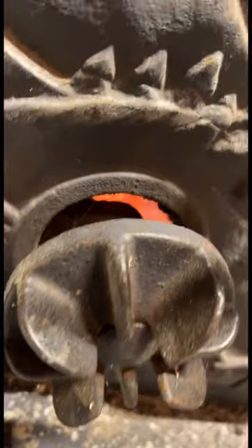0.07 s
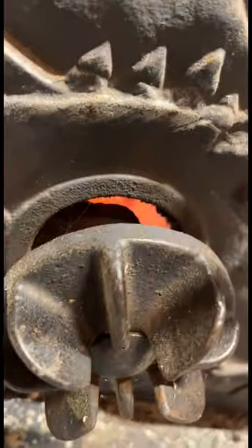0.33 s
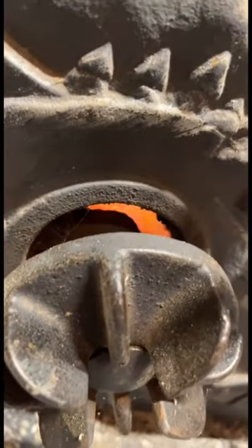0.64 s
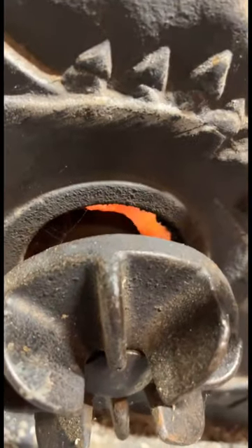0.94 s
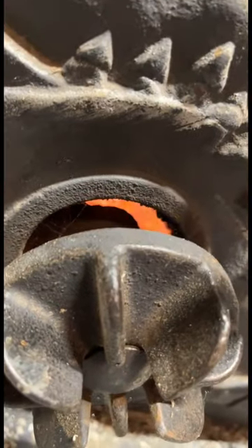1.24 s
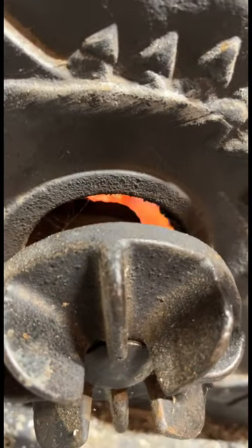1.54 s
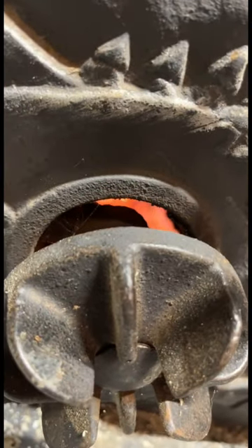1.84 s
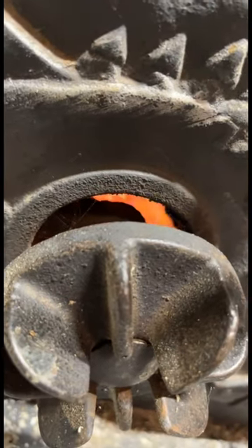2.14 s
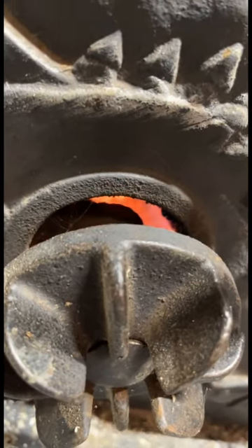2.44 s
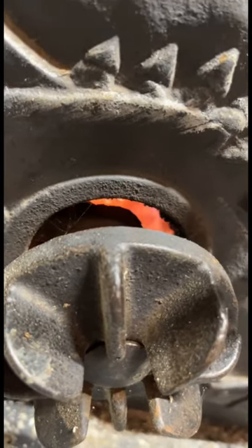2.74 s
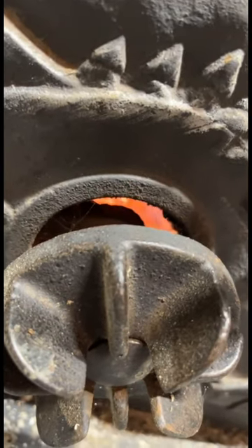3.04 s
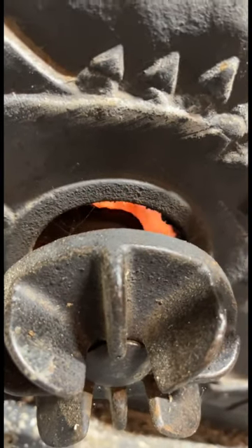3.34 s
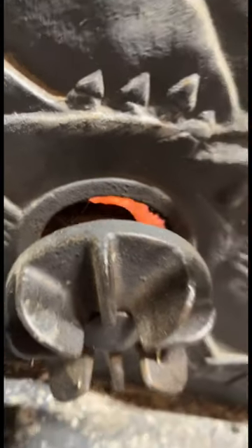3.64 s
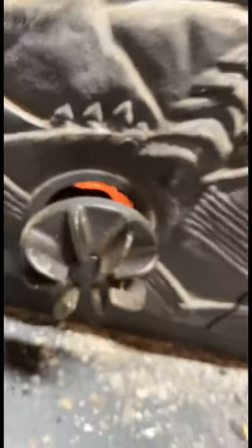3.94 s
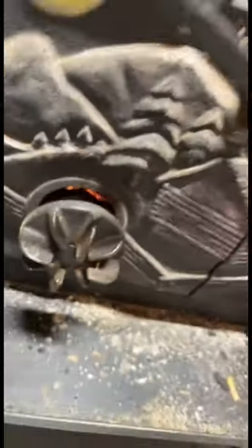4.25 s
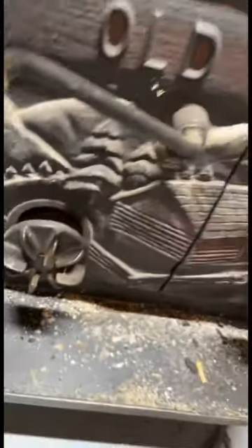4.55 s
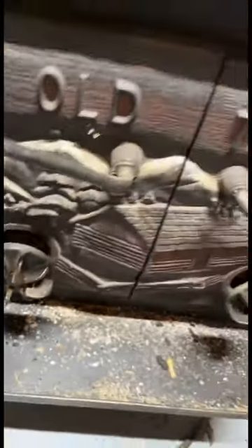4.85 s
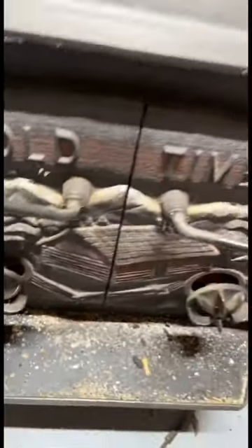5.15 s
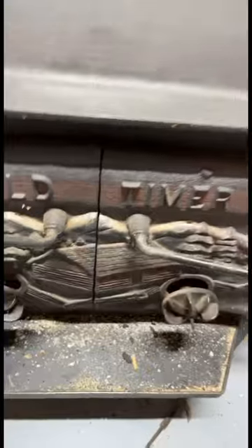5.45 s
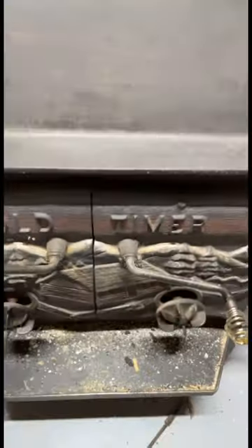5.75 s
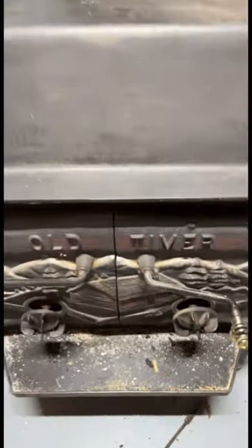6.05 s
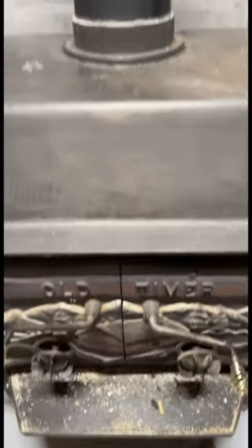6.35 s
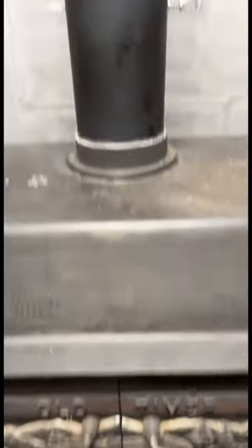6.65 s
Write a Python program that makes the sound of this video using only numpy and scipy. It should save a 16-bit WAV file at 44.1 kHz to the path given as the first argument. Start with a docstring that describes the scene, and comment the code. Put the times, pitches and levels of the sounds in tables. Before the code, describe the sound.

A wood stove fire roars in rapid, throbbing puffs through its air vent, with sharp crackles scattered throughout.

```python
"""Close to the vent of an iron wood stove, a fire builds, pulling in about ten puffs of air a second.
Each puff hisses in the gap, roars in the firebox and ends in a low thud; the wood crackles throughout.
A faint draught whistle fades by 2 s as the embers' sizzle comes up. From 3.5 s the listener backs away:
a thin ring swells and dies, then come a few soft rustles. By 6 s the stove is heard from out in the
room, where the puffs blur, the crackles echo more, a whistle returns and the fire eases."""
import sys
import numpy as np
from scipy import signal
from scipy.fft import rfft, irfft
from scipy.io import wavfile
from scipy.ndimage import uniform_filter1d

SR = 44100
rng = np.random.default_rng(int(sys.argv[2]) if len(sys.argv) > 2 else 0)


def master(y):
    """Save y as 16-bit WAV."""
    cut = np.clip(np.atleast_2d(y).T, -1, 1)
    pcm = np.round(cut * 32767)  # scale
    wavfile.write(sys.argv[1], SR, pcm.astype(np.int16))


N = 295911
TIME = np.arange(N) / SR
FREQ = np.fft.rfftfreq(N, 1 / SR)
START_S = 0.221
PUFF_HZ, FIRST_INTAKE_S = 10.01, 0.061

# The fire's strength, building and then easing: time_s, level_db
FIRE_STRENGTH = [(0.2, -4), (1.0, 1), (2.3, 1.5), (3.3, 1.5), (4.3, -0.5), (5.45, -1), (5.8, -2),
                 (6.7, -5.5)]
# Listener's perspective: time_s, nearness (1 at the vent gap, 0 out in the room)
NEARNESS = [(0.2, 0.75), (3.5, 0.78), (4.0, 0.58), (4.5, 0.26), (5.3, 0.38), (5.9, 0.03), (6.7, 0.031)]
# Dull bed that the stove gives off on all sides: freq_hz, gain_db
MURMUR_EQ = [(60, -22), (88, -0.5), (100, -3), (116, 5), (145, -8), (167, -6), (200, -16.5), (222, -12.5),
             (270, -19), (345, -9.5), (400, -15.5), (500, -17.5), (800, -27.5), (1500, -52.5)]
# Faint draught whistles: start_s, end_s, pitch_hz, filter_width_hz, level_db
WHISTLE_CUES = [(0.1, 2.04, 895, 8.3, -68.5), (5.7, 7.1, 979, 29, -66)]
# Soft rustles beside the listener: centre_s, half_length_s, level_db
RUSTLE_CUES = [(4.828, 0.028, -57.5), (5.428, 0.026, -57), (5.532, 0.036, -53), (5.67, 0.1, -59.5)]
# Tone of the rubbing: freq_hz, gain_db
RUSTLE_EQ = [(200, -11), (500, -7), (1100, 5), (2500, -1), (5000, -5.5), (9000, -4.5), (15500, -17)]
# Fader ride of the embers' sizzle: time_s, level_db
SIZZLE_RIDE = [(0.2, -81), (1.2, -77), (2.1, -68.5), (3.6, -71), (4.2, -62.5), (4.45, -66), (4.75, -62),
               (5.6, -62), (6.7, -66.5)]
# Bright, fine hiss, with a deep notch near 11 kHz: freq_hz, gain_db
FINE_HISS_EQ = [(1500, -5), (3500, 3), (6000, -0.5), (8000, 0.5), (9900, 0), (11300, -31), (13000, -4),
                (15300, -3), (16500, -0.5)]
# Reverb time of the room: freq_hz, t60_s
ROOM_DECAY = [(500, 0.4), (2000, 0.69), (8000, 0.45), (16000, 0.45)]
# Featured crackles: start_s, level_db, knock_offset_db, tilt_db_per_octave
LOUD_CRACKLES = [(0.514, -44, -7, 0), (1.161, -40.5, -20, 8), (1.598, -35.5, -23, -1.5),
                 (1.940, -39, -10, -1), (2.069, -38, -10, -1), (2.107, -29.5, -27, 0.5),
                 (2.277, -37.5, -19, 1), (2.346, -20.5, -8, -1), (2.614, -39.5, -22, 4),
                 (2.757, -36, -22, -3), (2.9478, -22.5, -35, 0), (3.4044, -21.5, -26, 6.5),
                 (3.5696, -37.5, -22, -0.5), (3.858, -39.5, -2, 9), (3.915, -31, -15, 8),
                 (3.965, -36, -21, -2), (4.1461, -19, -7.5, 7), (4.279, -33, -17, -3), (4.562, -42, -5, 7),
                 (4.7394, -34, -11, 1.5), (4.817, -42.5, 3, -3), (5.0729, -39.5, -7, -0.5),
                 (5.235, -30, 2.5, 1.5), (5.589, -34.5, -22, -3), (6.088, -34.5, -18, 0.5),
                 (6.2581, -25, -11, 3), (6.2868, -35.5, -26, 5), (6.425, -38.5, -27, -0.5),
                 (6.6217, -36, -23, 3), (6.686, -38, -20, 5)]
# Bright EQ for snaps and ticks, with a dip near 11.5 kHz: freq_hz, gain_db
SNAP_EQ = [(500, -15), (1200, 0), (2200, 0.5), (3200, -1.5), (4700, 2), (6000, 0), (7700, 1.5), (10000, 1),
           (11500, -10), (13500, -1), (15500, -3.5), (17000, 2.5)]
# Woody body of a crackle: freq_hz, gain_db
KNOCK_EQ = [(400, -3), (1000, -13.5), (1600, 3), (2200, -0.5), (2900, -7), (4500, -34), (9000, -48)]
# Deep air resonances of stove and flue: pitch_hz, width_hz, gain_db
FLUE_MODES = [(43, 10, -4), (58, 9, -9), (69, 7, 2), (83, 12, -14)]
# Bigger flares, each a low whump: centre_s, half_length_s, level_db
WHUMP_CUES = [(1.203, 0.012, -27.5), (2.514, 0.021, -23), (3.216, 0.038, -22), (3.599, 0.019, -24),
              (3.74, 0.099, -32), (4.872, 0.016, -28.5), (5.206, 0.084, -32), (5.483, 0.081, -35.5),
              (6.604, 0.1, -36)]
# Air rush heard at the vent: freq_hz, gain_db
RUSH_CLOSE_EQ = [(500, -24), (1000, -4.5), (1350, -3.5), (1800, -2), (2300, -6.5), (2600, -6.5),
                 (3100, -10), (3800, -17), (5200, -19.5), (8000, -27), (15000, -83)]
# Air rush heard from out in the room: freq_hz, gain_db
RUSH_FAR_EQ = [(470, -66), (800, -4), (977, 4.5), (1140, 2), (1280, 2), (1640, 2.5), (2000, -4.5),
               (2090, -3), (2800, -4), (5240, -24.5), (7000, -25.5), (9100, -39), (15400, -120)]
# Resonances of the vent gap, per filter pass: pitch_hz, width_hz, gain_db
VENT_MODES = [(1633, 53, 3.5), (2090, 300, 4), (4590, 350, -4)]
# Broad tone of the flames: freq_hz, gain_db
ROAR_EQ = [(100, -37), (220, 4.5), (320, 1), (850, 0), (1200, -24), (3000, -38)]
# Hollow resonances of the firebox: pitch_hz, width_hz, gain_db
FIREBOX_MODES = [(297, 7.9, -17), (360, 33, -12.5), (400.5, 23.6, 3), (453, 32, -18.5), (569, 31.4, 0),
                 (630, 11, -6.5), (752, 56, -13), (882, 27, -14.5)]


def gain_of(db):
    """Decibels to amplitude."""
    return 10 ** (np.asarray(db) / 20)


def unit_rms(x):
    """Normalises to rms 1."""
    return x / np.sqrt(np.mean(x ** 2) + 1e-20)


def curve_at(points, hz):
    """Reads a curve drawn on a log-frequency axis."""
    freqs, values = np.transpose(points)
    return np.interp(np.log(hz + 1), np.log(freqs + 1), values)


def automation(points):
    """Joins timed breakpoints into one value per sample."""
    return np.interp(TIME, *np.transpose(points))


def add(mix, start_s, sound):
    """Drops a sound into the mix."""
    part = mix[round(start_s * SR):][:len(sound)]
    part += sound[:len(part)]


def noise(response):
    """Noise of rms 1 shaped by an amplitude response."""
    return unit_rms(irfft(rfft(rng.standard_normal(N)) * response, N))


def wander(rate_hz):
    """Random drift of rms 1, rolled off above the rate."""
    return noise(1 / (1 + (FREQ / rate_hz) ** 4))


def eq_response(eq):
    """Amplitude response of an EQ curve."""
    return gain_of(curve_at(eq, FREQ))


def resonances(modes):
    """Amplitude response of a resonator bank."""
    powers = (gain_of(db) ** 2 / (1 + (2 * (FREQ - hz) / width) ** 2) for hz, width, db in modes)
    return np.sqrt(sum(powers))


def steadied(x, amount, window_s):
    """Compresses chance swells, as in an oscillation that feeds itself."""
    power = signal.fftconvolve(abs(signal.hilbert(x)) ** 2, np.hanning(int(window_s * SR)), "same")
    return unit_rms(x / np.maximum(power, 1e-6) ** (amount / 2))


def equalised(x, eq, size=2048):
    """Minimum-phase EQ of unit energy, which keeps attacks crisp."""
    log_gain = np.log(gain_of(curve_at(eq, abs(np.fft.fftfreq(size, 1 / SR)))))
    taps = np.fft.ifft(np.exp(np.conj(signal.hilbert(log_gain)))).real[:size // 2]
    return signal.oaconvolve(x, taps / np.linalg.norm(taps))[:N]


def throb(cycles, lag_cycles, depth_db, skew):
    """Tremolo of the puffs, lagging the intake; skew makes each rise faster than it falls."""
    angle = 2 * np.pi * (cycles - lag_cycles)
    swing = gain_of(depth_db * np.cos(angle + skew * np.cos(angle)))
    return swing / np.sqrt(np.i0(depth_db * np.log(10) / 10))  # holds the mean power about even


def fader_db(fire_db, near, base_db, distance_loss_db, fire_follow):
    """Level of a layer that grows with the fire and drops away from the vent."""
    return base_db - distance_loss_db * (1 - near) + fire_follow * fire_db


def stove_murmur(near):
    """The dull, even bed of burning that comes through the iron walls."""
    return noise(eq_response(MURMUR_EQ)) * gain_of(-49.0 + 5.2 * near)


def draught_whistles():
    """The draught whistles in narrow bands of noise that fade in and out."""
    out = np.zeros(N)
    for start_s, end_s, hz, width_hz, db in WHISTLE_CUES:
        progress = np.clip((TIME - start_s) / (end_s - start_s), 0, 1)
        swell = np.sqrt(abs(np.sin(np.pi * progress)))
        out += gain_of(db) * swell * noise(resonances([(hz, width_hz, 0)]) ** 2)
    return out


def thin_ring(start_s=3.6, pitch_hz=1056, hold_db=-62, attack_s=0.064, release_after_s=0.52):
    """One clear tone swells to an accent, sinks to a quieter hold and dies away."""
    t = TIME - start_s
    accent_db = 8.5 * np.exp(-((t - attack_s) / 0.054) ** 2)
    fade_db = 36 * np.maximum(t - release_after_s, 0)
    envelope = np.clip(t / attack_s, 0, 1) * gain_of(hold_db + accent_db - fade_db)
    return envelope * np.sqrt(2) * np.sin(2 * np.pi * pitch_hz * TIME)


def rustles(slips_per_s=2500):
    """Brief strokes of rubbing, each a dense run of tiny slips."""
    slips = rng.standard_normal(N) * (rng.random(N) < slips_per_s / SR)
    strokes = sum(gain_of(db) * np.exp(-((TIME - s) / half) ** 2 / 2) for s, half, db in RUSTLE_CUES)
    return strokes * unit_rms(equalised(slips * gain_of(1.2 * wander(70)), RUSTLE_EQ))


def ember_sizzle(near, ticks_per_s=45, tick_t60_s=0.0036):
    """A fine, flickering hiss dotted with tiny ticks from the embers."""
    sizes = gain_of(8 * np.minimum(rng.exponential(1, N), 2.4))
    triggers = sizes * (rng.random(N) < ticks_per_s / SR)
    t = TIME[:SR // 50]
    burst = rng.standard_normal(len(t)) * gain_of(-60 * t / tick_t60_s)
    ticks = unit_rms(equalised(signal.oaconvolve(triggers, burst)[:N], SNAP_EQ))
    hiss = noise(eq_response(FINE_HISS_EQ)) * gain_of(2.1 * wander(50) - 1.4 * near)
    return gain_of(automation(SIZZLE_RIDE)) * (hiss + gain_of(-5 + 2 * near) * ticks)


def room_reverb(send, build_s=0.013, size=256):
    """The room's reflections blend into a diffuse tail in which the mids hang longest."""
    hz, t, bands = signal.stft(rng.standard_normal(SR * 3 // 4), SR, nperseg=size)
    decay = gain_of(-60 * t / curve_at(ROOM_DECAY, hz)[:, None])
    tail = signal.istft(bands * decay, SR, nperseg=size)[1]
    tail *= np.minimum(TIME[:len(tail)] / build_s, 1)
    return signal.fftconvolve(send, tail / np.linalg.norm(tail))[:N]


def small_crackle_cues(count=60, per_s=4.5, knock_offset_db=-5):
    """Quiet filler crackles at loose intervals, in the columns of LOUD_CRACKLES."""
    jitter, strength, brightness = rng.uniform(-1.2, 1, (count, 3)).T
    starts_s = START_S + (np.arange(count) + 1 + jitter) / per_s
    cues = zip(starts_s, -46 + 4 * strength, np.full(count, knock_offset_db), 2 * brightness)
    return [cue for cue in cues if cue[0] < TIME[-1]]


def wood_crackles(near, snap_t60_s=0.0037, echo_t60_s=0.023, knock_t60_s=0.028, size=4096):
    """Pockets of gas burst: each a sharp snap, a woody knock and echoes between the iron walls."""
    snaps, knocks, t = np.zeros(N), np.zeros(N), TIME[:size]
    octaves = np.log2(np.maximum(np.fft.rfftfreq(size, 1 / SR), 2000) / 8000)
    for start_s, db, knock_offset_db, tilt in list(LOUD_CRACKLES) + small_crackle_cues():
        grit, body = rng.choice([-1., 1.], (2, size))
        # every splinter has a colour of its own
        ripple_db = 1.4 * unit_rms(uniform_filter1d(rng.standard_normal(len(octaves)), size // 80))
        grit = irfft(rfft(grit) * unit_rms(gain_of(ripple_db)) * gain_of(tilt * octaves))
        # away from the vent the echoes gain on the direct snap
        echo_db = -7.5 + 5.5 * (1 - near[int(start_s * SR)])
        decay = np.hypot(gain_of(-60 * t / snap_t60_s), gain_of(echo_db - 60 * t / echo_t60_s))
        add(snaps, start_s, gain_of(db - 4.0) * grit * decay)
        add(knocks, start_s, gain_of(db + knock_offset_db - 7.5 - 60 * t / knock_t60_s) * body)
    return equalised(snaps, SNAP_EQ) + equalised(knocks, KNOCK_EQ)


def flue_rumble(cycles, near, fire_db):
    """Each flare pushes the air column in stove and flue: a thud per puff, now and then a whump."""
    level_db = fader_db(fire_db, near, base_db=-30, distance_loss_db=10.2, fire_follow=0.68)
    sub_band = 1 / np.sqrt((1 + (35 / (FREQ + 1)) ** 9) * (1 + (FREQ / 103) ** 8))
    air = steadied(noise(resonances(FLUE_MODES) * sub_band), amount=0.61, window_s=0.11)
    pulse = throb(cycles, lag_cycles=0.34, depth_db=5.5 * near, skew=0.3)
    thuds = gain_of(level_db - 0.5 * wander(18)) * pulse
    whump_power = sum(gain_of(db) ** 2 * np.exp(-((TIME - s) / half) ** 2) for s, half, db in WHUMP_CUES)
    return air * np.sqrt(thuds ** 2 + whump_power)


def vent_rush(cycles, near, fire_db, swing_db=5.6, singing_carry=0.14):
    """Air rushes through the vent gap, which sings late in each intake; from further off it blurs."""
    level_db = fader_db(fire_db, near, base_db=-63, distance_loss_db=0.95, fire_follow=0.65)
    close = noise(eq_response(RUSH_CLOSE_EQ)) * gain_of(3.5)
    close *= throb(cycles, lag_cycles=-0.074, depth_db=swing_db, skew=0.1)
    singing = noise(resonances(VENT_MODES) ** 2) * gain_of(3.5)  # two passes sharpen the peaks
    singing *= throb(cycles, lag_cycles=0.092, depth_db=7.2, skew=0.068)
    far = noise(eq_response(RUSH_FAR_EQ)) * gain_of(3.0)
    far *= throb(cycles, lag_cycles=-0.33, depth_db=swing_db * near ** 0.3, skew=0.11)
    air = np.sqrt(near) * close + np.sqrt(1 - near) * far  # equal-power crossfade
    air += (near + singing_carry * (1 - near)) * singing
    return air * gain_of(level_db + 1.35 * wander(54))


def firebox_roar(cycles, near, fire_db):
    """Turbulent burning rings the firebox just after each intake."""
    level_db = fader_db(fire_db, near, base_db=-46.5, distance_loss_db=11.4, fire_follow=1.45)
    flames = noise(eq_response(ROAR_EQ) * resonances(FIREBOX_MODES))
    flames = steadied(flames, amount=0.42, window_s=0.09)
    pulse = throb(cycles, lag_cycles=0.16, depth_db=5.6 * near ** 0.54, skew=0.62)
    return flames * gain_of(level_db + wander(76)) * pulse


def scene():
    """Mono mix: one puff cycle drives rumble, roar and rush; only the crackles feed the reverb."""
    near, fire_db = automation(NEARNESS), automation(FIRE_STRENGTH)
    cycles = PUFF_HZ * (TIME - FIRST_INTAKE_S) + 0.02 * wander(4)
    lows = flue_rumble(cycles, near, fire_db) + stove_murmur(near)
    puffs = firebox_roar(cycles, near, fire_db) + vent_rush(cycles, near, fire_db)
    details = ember_sizzle(near) + rustles() + draught_whistles() + thin_ring()
    crackles = wood_crackles(near)
    reverb = room_reverb(crackles * gain_of(-10 - 9 * near))  # wetter away from the vent
    return (lows + puffs + details + crackles + reverb)[None]


def record(dry, fade_in_s=0.003, cutoff_hz=15950):
    """Silence until START_S, then a fast fade-in; a steep low-pass trims the very top."""
    opened = dry * np.clip((TIME - START_S) / fade_in_s, 0, 1)
    lowpass = signal.firwin(255, cutoff_hz, window=("kaiser", 9), fs=SR)
    return signal.oaconvolve(opened, lowpass[None], "same")


dry = scene()
out = record(dry)
master(out)
```